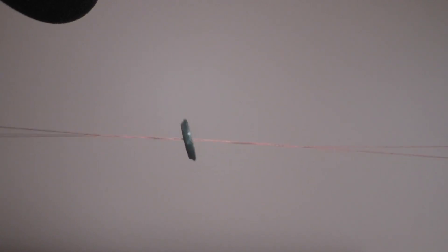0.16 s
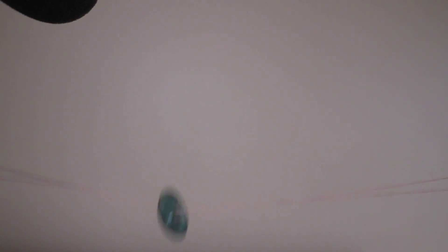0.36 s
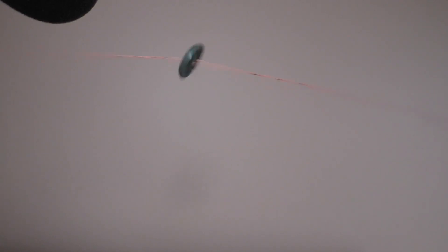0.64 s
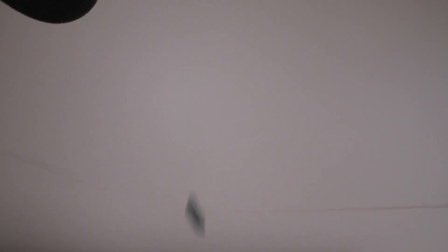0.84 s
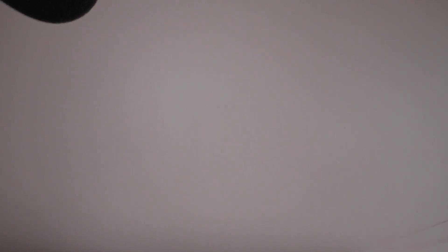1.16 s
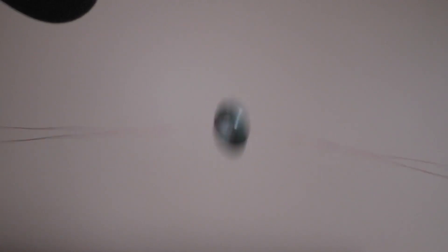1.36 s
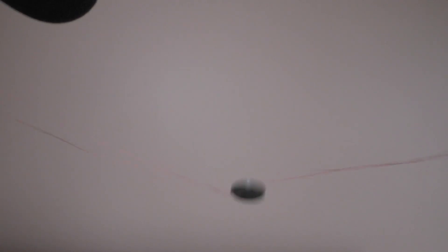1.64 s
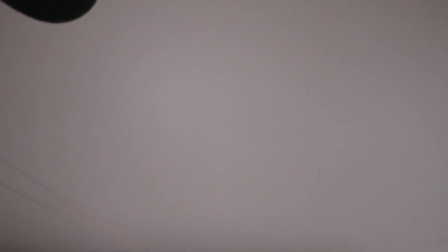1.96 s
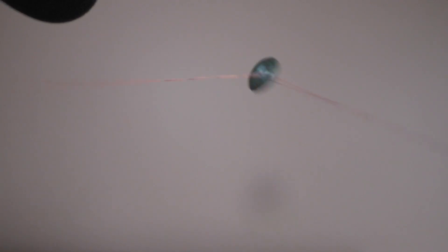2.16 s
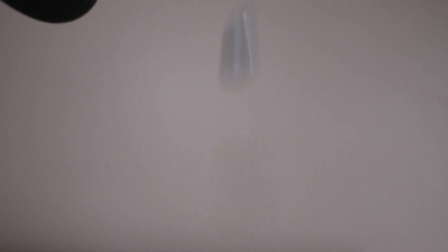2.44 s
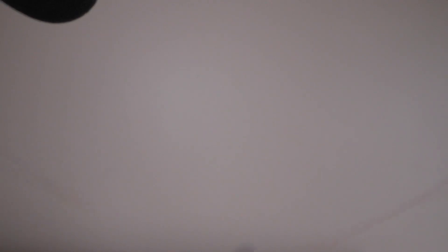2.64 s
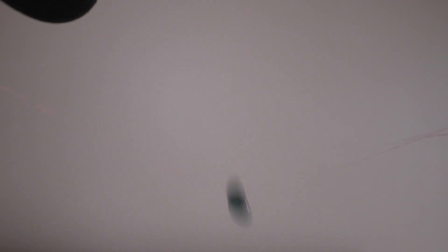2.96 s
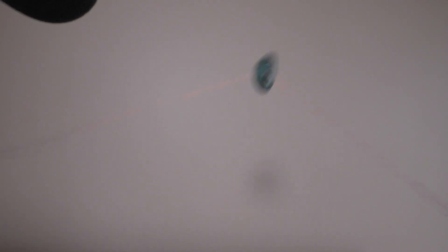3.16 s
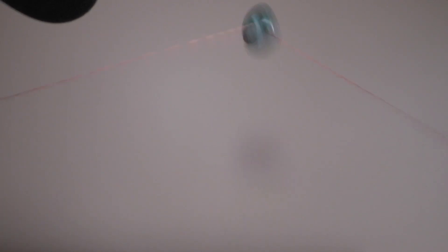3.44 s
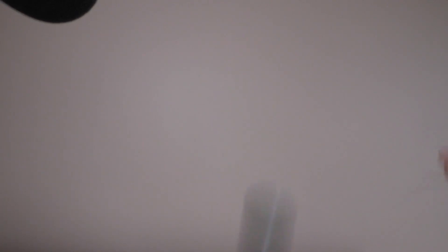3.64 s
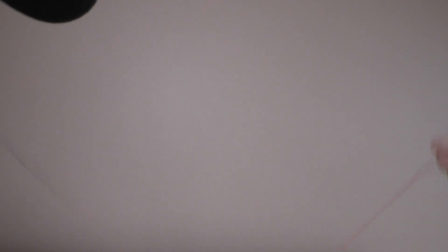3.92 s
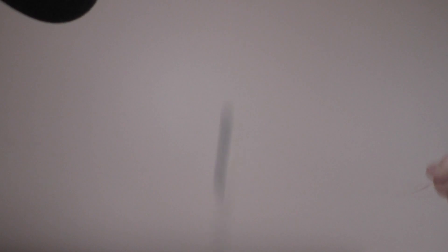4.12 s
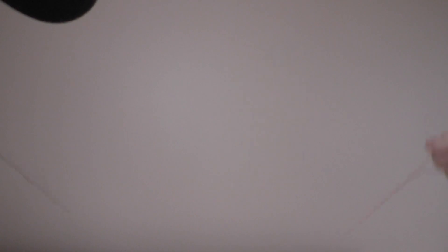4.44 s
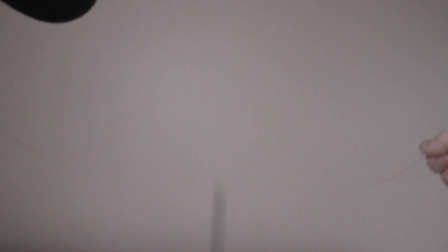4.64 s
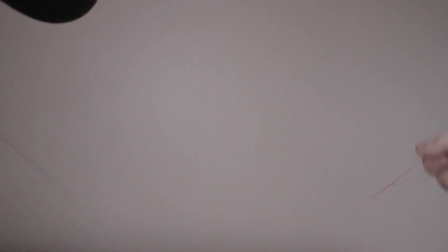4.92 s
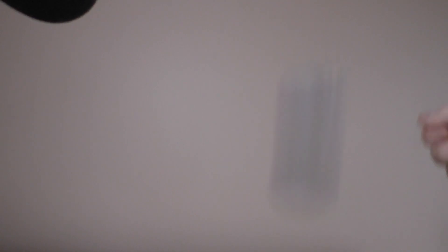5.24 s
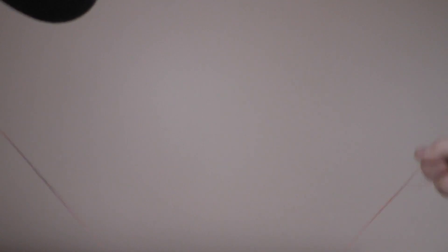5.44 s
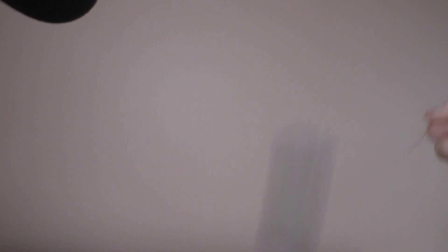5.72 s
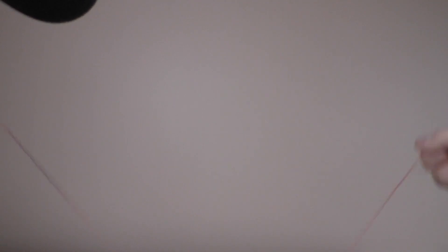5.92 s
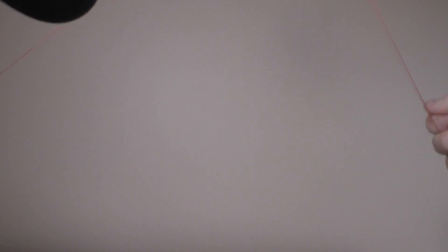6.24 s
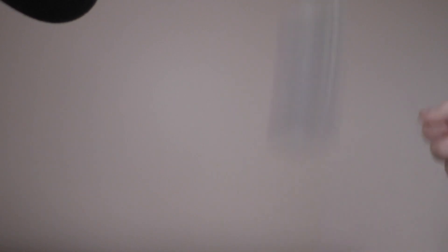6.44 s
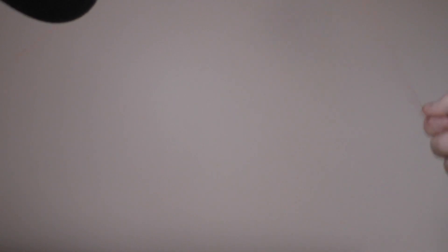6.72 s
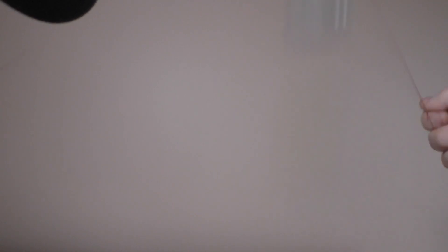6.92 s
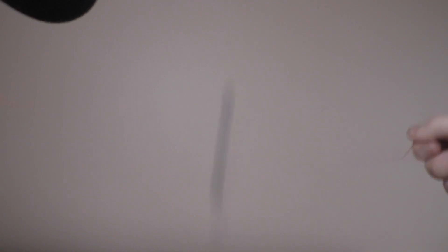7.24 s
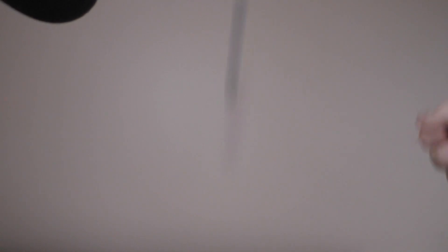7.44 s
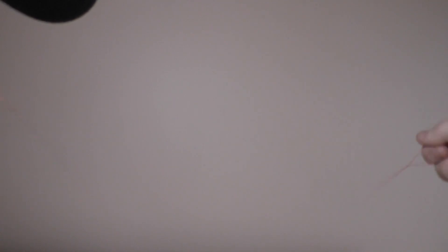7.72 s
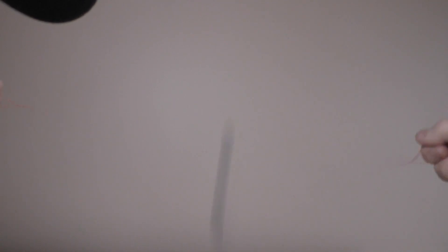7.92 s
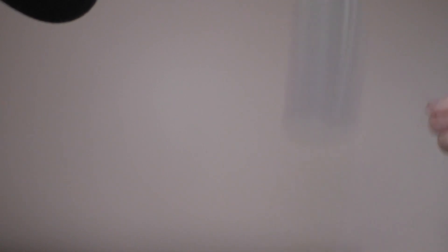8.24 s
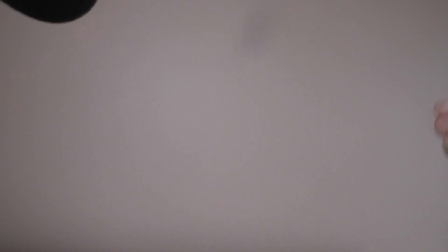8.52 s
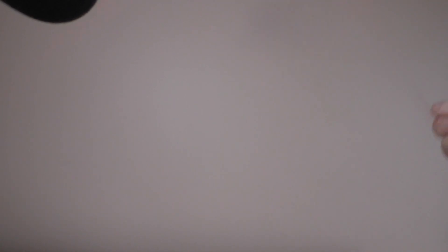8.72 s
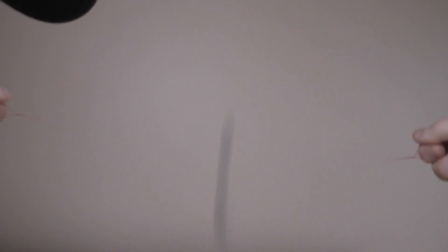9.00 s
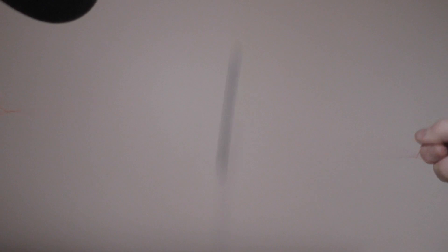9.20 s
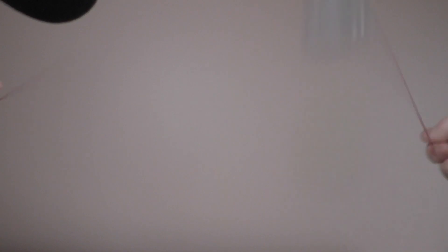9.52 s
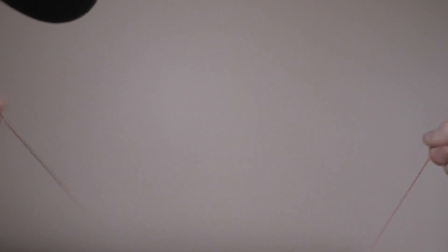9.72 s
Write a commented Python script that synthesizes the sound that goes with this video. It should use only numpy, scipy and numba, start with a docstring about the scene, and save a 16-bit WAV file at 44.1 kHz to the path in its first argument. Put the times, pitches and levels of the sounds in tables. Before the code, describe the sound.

A small weight on a looped string whirls close to the microphone in deep, fast, throbbing air thumps, with faint string creaks and steady hiss.

```python
"""A quiet room: a flat weight on a looped string is swung round between two hands, close to the microphone.
Each turn sweeps a pressure pulse with eddies and buffeting past it, which thumps and pulls the limiter down.
The string hums at a low pitch while taut; stick-slip grit through resonances makes its rasps, creaks and snaps.
Slow lumps of stirred air and a steady hiss of shaped noise with faint wavering tones lie under it."""
import sys
import numpy as np
from scipy import signal
from scipy.fft import rfft, irfft, next_fast_len
from scipy.io import wavfile
from scipy.ndimage import uniform_filter1d
from numba import njit

SR = 44100
rng = np.random.default_rng(int(sys.argv[2]) if len(sys.argv) > 2 else 0)


def waveform_to_disk(signal):
    """Save audio, clipped to [-1, 1], as 16-bit WAV at the path in sys.argv[1]."""
    frames = np.transpose(np.atleast_2d(signal))
    scaled = np.clip(frames, -1, 1) * 32767
    samples = np.round(scaled).astype(np.int16)
    wavfile.write(sys.argv[1], SR, samples)


N = 434826

# turns of the steady swing: passing moment t/s, pressure level/dB, level of the upswing creak/dB
TURNS = [(4.3123, 4.5, -35), (4.5485, 5, -36), (4.817, 4, -45), (5.0624, 8.5, -33), (5.314, 5.5, -30),
         (5.5635, 5.5, -30), (5.8015, 6.5, -34), (6.0349, 5.5, -29.5), (6.2704, 7.8, -33),
         (6.5032, 8.5, -33), (6.7371, 6.5, -34), (6.9692, 8.6, -31), (7.1933, 10, -27.5),
         (7.4096, 10.5, -27), (7.633, 7.5, -28.5), (7.8611, 5.5, -28.5), (8.085, 5, -27), (8.3016, 9, -29),
         (8.52, 6, -30.5), (8.7347, 8.5, -30), (8.95, 5.0, -28.5), (9.1675, 6.5, -32.5), (9.3698, 8.5, -30),
         (9.571, 4.5, -34)]


def undb(db):
    """Decibels to gain."""
    return 10 ** (np.asarray(db) / 20)


def coloured(points):
    """Noise of rms 1 with a spectrum drawn through (f/Hz, level/dB) points on a log frequency axis."""
    hz, db = np.transpose(points)
    size = next_fast_len(N)
    f = np.maximum(np.arange(size // 2 + 1) * SR / size, 1)
    shape = undb(np.interp(np.log(f), np.log(hz), db))
    x = irfft(rfft(rng.standard_normal(size)) * shape, size)[:N]
    return x / np.std(x)


def ring(x, hz, width_hz):
    """One resonance, gain 1 at its centre."""
    return signal.lfilter(*signal.iirpeak(hz, hz / width_hz, SR), x)


def grit(spread_db, most_db):
    """Stick-slip: a dense run of clicks of unequal size, rms 1."""
    boost_db = np.minimum(spread_db * rng.exponential(size=N), most_db)
    x = rng.standard_normal(N) * undb(boost_db)
    return x / np.std(x)


def walk(rate):
    """Random levels, rate of them per second, joined by straight slews; spread near 1.5."""
    k = int(SR / rate)
    held = np.repeat(rng.standard_normal(N // k + 1), k)
    return 1.8 * uniform_filter1d(held, k)[:N]


def add(out, s, x):
    """Mix x into out from time s on."""
    i = int(s * SR)
    out[i:i + len(x)] += x[:len(out) - i]


def burst(source, s, length):
    """A stretch of source that swells to a peak at half of length and dies away a little more slowly."""
    u = np.arange(int(4 * length * SR)) / (max(length, .001) * SR)
    piece = source[int(s * SR):int(s * SR) + len(u)]
    envelope = (2 * u * np.exp(1 - 2 * u)) ** 2
    return piece * envelope[:len(piece)]


def blade():
    """Near field of a body flying past: a suction pulse plus a push-pull; its wind swells as it nears."""
    # spectra of the moving air: f/Hz, relative level/dB
    eddy_colour = [(60, -40), (150, 3), (260, 8), (500, 4.5), (1000, -5.5), (2000, -21), (5000, -60)]
    buffet_colour = [(30, -34), (75, 4.5), (140, 0.5), (220, -12), (400, -27.5), (1200, -80)]
    rush_colour = [(100, -40), (300, 10), (700, 11.5), (2500, 5), (8000, -2.5), (15000, -20)]
    out, t = np.zeros(N), np.arange(-.12, .12, 1 / SR)  # s around the closest moment
    eddies, buffet, rush = coloured(eddy_colour), coloured(buffet_colour), coloured(rush_colour)
    taper = np.sqrt(np.hanning(len(t)))
    rise = 1 / (1 + ((t + 0.0044) / 0.021) ** 2)
    fall = np.exp(-((t + 0.0031) / 0.019) ** 2)
    swell = taper * np.where(t < -.005, rise, fall)
    approach = taper * np.exp(-((t + 0.085) / 0.059) ** 2)  # the string cuts the air ahead of the weight
    for s, db, passing, lean, eddy_db, buffet_db in passes():
        u = t / passing * np.where(t < 0, 1.3, 1)  # it arrives more abruptly than it leaves
        suction = (2 * u ** 2 - 1) / (1 + u ** 2) ** 2.5
        push = u / (1 + u ** 2) ** 1.5
        pulse = np.cos(lean) * suction + np.sin(lean) * push
        add(out, s + t[0], undb(db) * taper * pulse)
        now = np.minimum(((s + t) * SR).astype(int), N - 1)
        gust = undb(eddy_db) * eddies[now] + undb(buffet_db) * buffet[now]
        add(out, s + t[0], swell * gust + undb(db - 49.5) * approach * rush[now])
    return out


def passes():
    """Rows (t/s, pressure/dB, passing/s, lean/rad, eddies/dB, buffeting/dB): quick turns pass faster."""
    # loose jerks of the weight before and after the steady swing:
    # passing moment t/s, pressure level/dB, passing time/ms, lean of the blade/rad
    jerks = [(0.8978, -11.6, 22.5, -0.88), (1.007, 0.5, 34.0, 1.37), (1.6506, -0.3, 5.7, -1.66),
             (2.4955, 0.8, 28.7, 2.32), (2.8342, -4.4, 40.0, -0.1), (2.9716, -12.2, 12.8, 0.86),
             (3.4658, 5.6, 26.2, 1.24), (3.7334, 6.7, 26.9, -1.92), (4.0423, 2.2, 25.5, 0.58),
             (9.842, 1.1, 21.3, -1.3)]
    jerk_eddy_db, jerk_buffet_db = -45, -34.5
    usual_db, usual_turn_s = 7, .23  # a middling sweep
    s, db, _ = np.transpose(TURNS)
    turn_s = np.gradient(s)
    eddy_chance, buffet_chance = rng.standard_normal((len(s), 2)).T
    passing_s = 0.08 * turn_s
    lean_rad = 0.52 + 0.08 * (db - usual_db)  # stronger sweeps lean more
    # a quicker turn sheds louder eddies: 11 dB per octave of turn rate, 1 dB scatter
    eddy_db = -38 + 11 * np.log2(usual_turn_s / turn_s) + 1.0 * eddy_chance
    # a stronger turn buffets more: dB for dB, 3 dB scatter
    buffet_db = -28 + 1 * (db - usual_db) + 3 * buffet_chance
    swing = zip(s, db, passing_s, lean_rad, eddy_db, buffet_db)
    loose = [(a, b, ms / 1000, lean, jerk_eddy_db, jerk_buffet_db) for a, b, ms, lean in jerks]
    return loose + list(swing)


def string():
    """Stick-slip of the string: rasps ring the weight high; creaks and snaps ring lower, near the fingers."""
    # string sliding through the holes: t/s, level/dB, broad scrape against it/dB, length/s
    rasps = [(0.078, -35.5, -8, 0.035), (0.106, -36, -2, 0.043), (0.59, -45, 5, 0.063),
             (0.838, -34.5, -10, 0.049), (0.976, -30, -10, 0.06), (1.6003, -33, -10, 0.036),
             (1.638, -29.5, -3, 0.02), (2.141, -34.5, -6, 0.074), (2.469, -27, -8, 0.047),
             (2.623, -36.5, 0.5, 0.046), (2.798, -38, -2, 0.033), (2.935, -37, 3, 0.032),
             (2.99, -38.5, 3, 0.036), (3.118, -27.5, -6.5, 0.05), (3.24, -39, -1.5, 0.15),
             (3.462, -24.5, -7, 0.047), (3.611, -38.5, 4, 0.046)]
    # resonances of the rasping weight: f/Hz, width of the first of two filters/Hz, level/dB
    rasp_modes = [(8030, 610, -1.5), (7700, 3300, -9.5), (11820, 1900, -13)]
    # short broad snaps: t/s, level/dB, f/Hz, low knock against it/dB, length/s
    snaps = [(0.883, -22.5, 3000, -5, 0.007), (1.644, -20, 2950, 2, 0.0039), (2.317, -25, 2720, -9, 0.0045),
             (2.348, -21.5, 2560, -13, 0.0045), (2.958, -23, 2480, -2, 0.0048),
             (5.939, -22, 3760, -9, 0.0064), (5.997, -21, 3240, -12, 0.0035),
             (6.472, -11, 3930, -23, 0.0023), (6.851, -27, 3280, -3, 0.0037),
             (7.292, -28, 3020, -2, 0.0038)]
    out, slip = np.zeros(N), grit(2.6, 10.0)
    weight = sum(undb(db) * ring(ring(slip, hz, width), hz, 2 * width) for hz, width, db in rasp_modes)
    scrape = ring(slip, 3500, 4800)
    for s, db, scrape_db, length in rasps:
        rasp = 1.56 * weight + undb(scrape_db) * scrape
        add(out, s, undb(db) * burst(rasp, s, length))
    for s, db, hz, length in creaks():
        rub = burst(slip, s, length)
        body = ring(ring(rub, hz, 1500), hz, 2800)
        add(out, s, undb(db) * (0.85 * body + 0.5 * ring(rub, 6800, 3900)))
    for s, db, hz, knock_db, length in snaps:
        tick = burst(slip, s, length)
        add(out, s, undb(db) * (.5 * ring(tick, hz, 530) + 0.24 * ring(tick, 5600, 9000)))
        add(out, s + .003, undb(db + knock_db) * ring(tick, 700, 1200))  # the knock lags 3 ms
    return out


def creaks():
    """Rows (t/s, level/dB, f/Hz, length/s): one creak per upswing, one faint per turn, and further ones."""
    # further creaks, loud to faint, at other moments of the turn: t/s, level/dB
    further = [(4.187, -32), (4.386, -32), (4.504, -34), (4.6736, -33.5), (4.789, -28), (5.032, -30.5),
               (5.12, -35), (5.5676, -30), (5.762, -33), (5.8779, -33), (5.995, -30), (6.225, -32),
               (6.368, -37), (6.472, -32), (6.607, -29), (6.692, -32), (6.845, -32), (6.922, -34),
               (7.073, -31), (7.162, -33), (7.28, -33), (7.818, -36), (7.8804, -32), (8.12, -31),
               (8.55, -32)]
    # central pitch, rising and falling with the pull on the string: t/s, f/Hz
    pull_pitch = [(4.2, 2840), (5.6, 2850), (6.2, 3800), (7.6, 3730), (8.2, 3300), (8.9, 3470), (9.5, 3100)]
    s, _, db = np.transpose(TURNS)
    turn_s = np.gradient(s)
    further_s, further_db = np.transpose(further)
    moment, size = rng.random(len(s)), rng.standard_normal(len(s))
    upswing_s = s - 0.384 * turn_s
    faint_s = s + turn_s * moment  # at a chance moment of each turn
    when = np.concatenate([upswing_s, faint_s, further_s])
    loud = np.concatenate([db, -37 + 2 * size, further_db])
    scatter = np.exp(0.063 * rng.standard_normal(len(when)))
    hz = np.interp(when, *np.transpose(pull_pitch)) * scatter
    length = 0.092 * np.interp(when, s, turn_s)  # a share of the turn
    return zip(when, loud, hz, length)


def hum():
    """The taut string shakes the weight at one low pitch, with a weak wavering overtone."""
    # two taut spells: central f/Hz, then points of t/s, rms level/dB
    spells = [(33.0, [(0.0, -18.5), (0.45, -18.5), (0.76, -24), (0.8, -45)]), (34.5, [(1.76, -38),
              (1.9, -26), (2.35, -21.5), (2.46, -25)])]
    out, t = np.zeros(N), np.arange(N) / SR
    for hz, part in spells:
        s, db = np.transpose(part)
        phase = 2 * np.pi * np.cumsum(hz * (1 + .02 * walk(5.97))) / SR
        fade = np.clip(np.minimum(t - s[0] + .02, s[-1] - t) / 0.0235, 0, 1)
        overtone = undb(-32 + 1.4 * walk(8.0)) * np.sin(2 * phase)
        tone = np.sin(phase) + overtone
        out += np.sqrt(2) * fade * undb(np.interp(t, s, db)) * tone
    return out


def draught():
    """Slow lumpy pressure from the air that the swing keeps moving."""
    # spectrum of the stirred air: f/Hz, relative level/dB
    draught_colour = [(4, 12), (10, 14), (16, 5), (22, -2), (32, -7), (60, -15), (100, -23), (215, -35),
                      (500, -50), (2000, -90)]
    lumps_db = 2.2 * walk(12)
    drift_db = 1.5 * walk(3)
    return coloured(draught_colour) * undb(-16.5 + drift_db + lumps_db)


def hiss():
    """Steady hiss, alike in both channels, plus a fainter part opposite in left and right, and faint tones."""
    # spectra of the alike and the opposite part: f/Hz, relative level/dB
    alike_colour = [(47, -18), (80, -14), (107, 1), (124, -11), (202, -6.5), (231, -12.5), (329, -10.5),
                    (401, -14), (523, -14), (1040, -17), (1380, -19), (3270, -20.5), (15700, -21.5)]
    opposite_colour = [(18, -28), (30, -49), (100, -13), (183, -3.5), (445, -6), (1530, -7), (3720, -6),
                       (8600, -6), (9540, -12), (10300, -38), (12100, -44), (13800, -42), (15700, -32)]
    # faint wavering tones, each a narrow band of noise: f/Hz, width/Hz, rms level/dB
    whine = [(100, 12, -51), (975, 22, -65), (1625, 11, -67), (2497, 16, -68), (15722, 10, -70)]
    tones = np.zeros(N)
    for hz, width, db in whine:
        to_rms_1 = np.sqrt(SR / np.pi / width)
        tones += undb(db) * to_rms_1 * ring(rng.standard_normal(N), hz, width)
    alike = undb(-39) * coloured(alike_colour) + tones
    opposite = undb(-50) * coloured(opposite_colour)
    return alike + opposite * np.array([[1], [-1]])


def scene():
    """All sources together; the balance of the moving air wavers a trace between left and right."""
    balance = undb(-45) * walk(41) * np.array([[1], [-1]])
    air = (blade() + draught()) * (1 + balance)
    return air + hum() + string() + hiss()


@njit
def limit(peak, top, attack, hold, quick, slow, share):
    """Gain that presses peaks towards top, holds, then recovers in a quick and a slow stage."""
    gain, a, b, left = np.empty(len(peak)), 0., 0., 0.  # a, b: quick and slow gain reduction
    for i in range(len(peak)):
        need = max(1 - top / (peak[i] + 1e-9), 0.)
        if need > a:
            a, left = a + attack * (need - a), hold
        elif left > 0:
            left -= 1
        else:
            a -= quick * a
        b = max(a, b - slow * b)
        gain[i] = 1 - share * b - (1 - share) * a
    return gain


def record(dry):
    """Bass roll-off of microphone and preamplifier, a linked limiter, then the treble cut."""
    w = 2 * np.pi * 14.0  # second-order roll-off at 14 Hz, Q 0.9
    x = signal.lfilter(*signal.bilinear([1, 0, 0], [1, w / .9, w ** 2], SR), dry)
    x = signal.lfilter(*signal.butter(1, 25.0, "high", fs=SR), x)
    per_s = lambda s: 1 / (s * SR)  # time constant in s to a step per sample
    hold, quick, slow, slow_share = .025 * SR, per_s(.005), per_s(.06), .3
    peak = np.abs(x).max(axis=0)  # the louder channel steers both
    x = x * limit(peak, .68, per_s(0.00056), hold, quick, slow, slow_share)
    return signal.sosfilt(signal.ellip(12, .2, 80, 15740, fs=SR, output="sos"), x)


dry = scene()
out = record(dry)
waveform_to_disk(out)
```